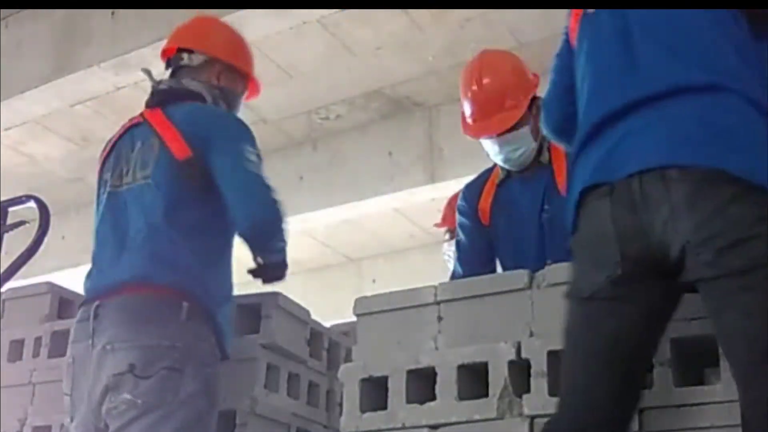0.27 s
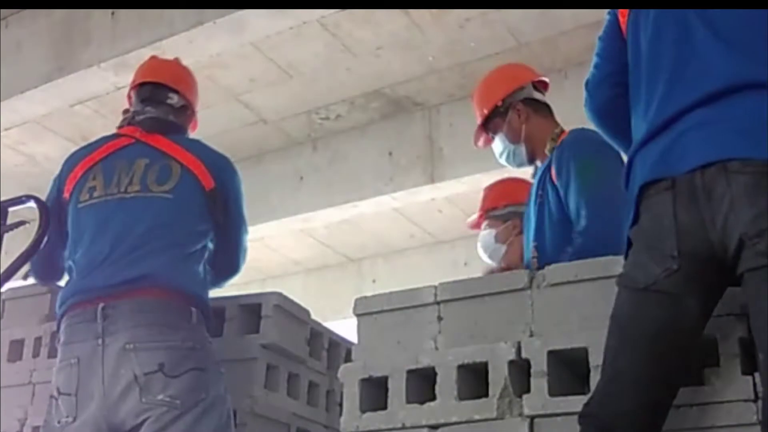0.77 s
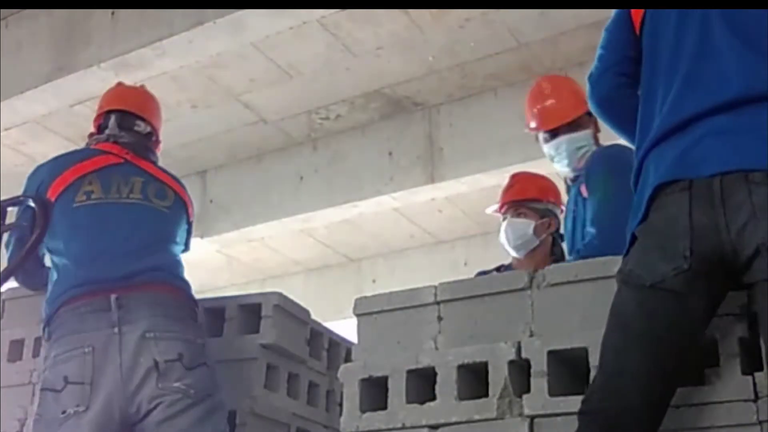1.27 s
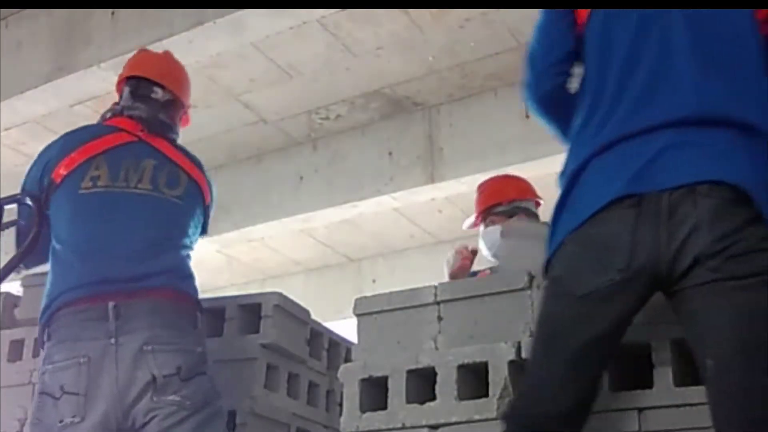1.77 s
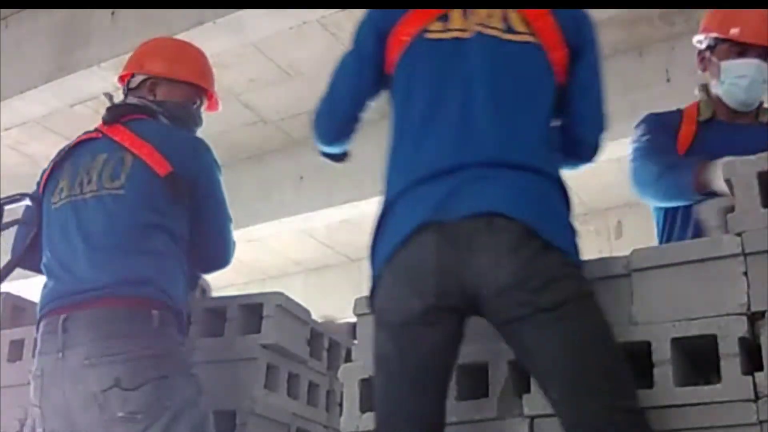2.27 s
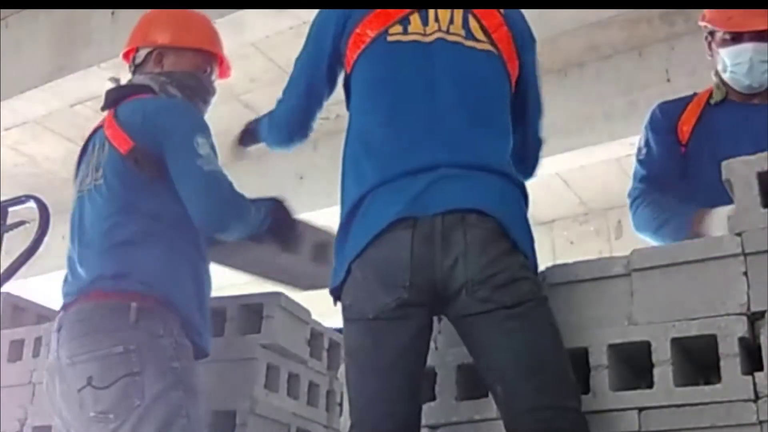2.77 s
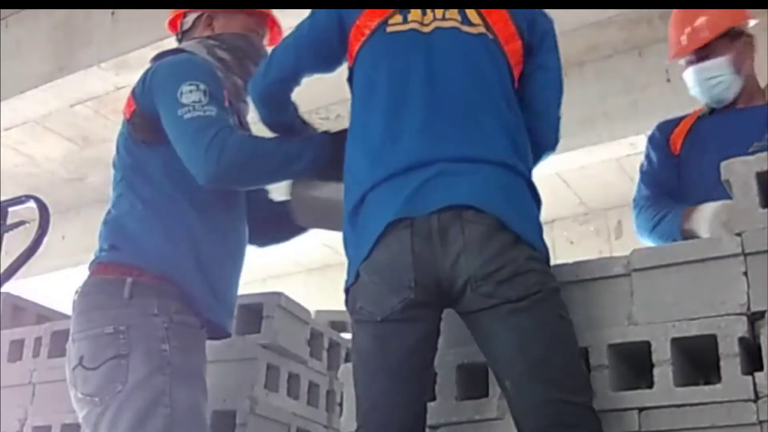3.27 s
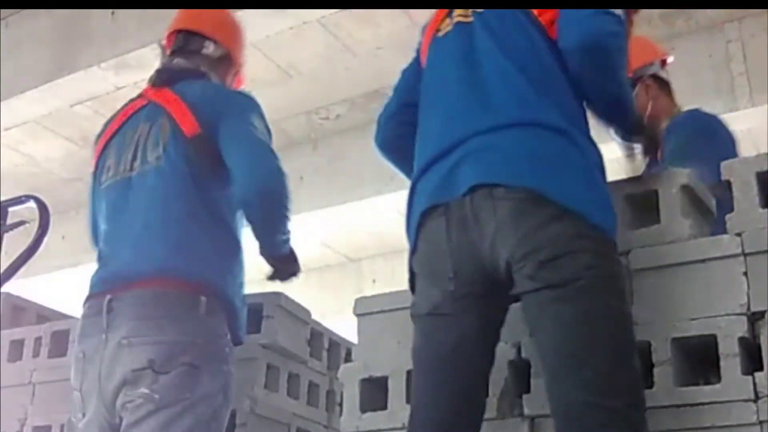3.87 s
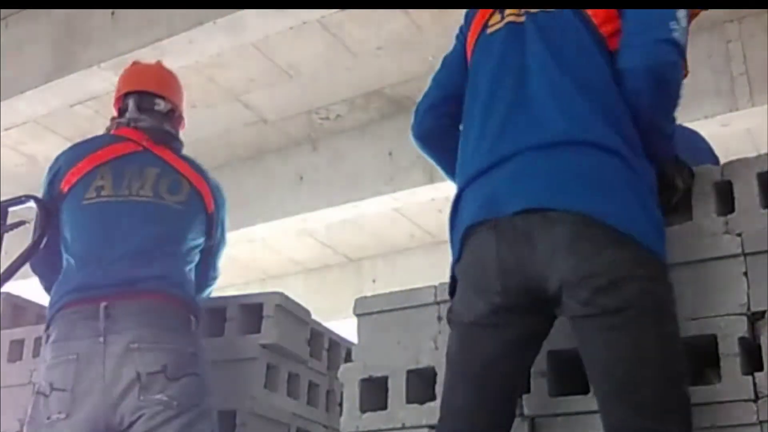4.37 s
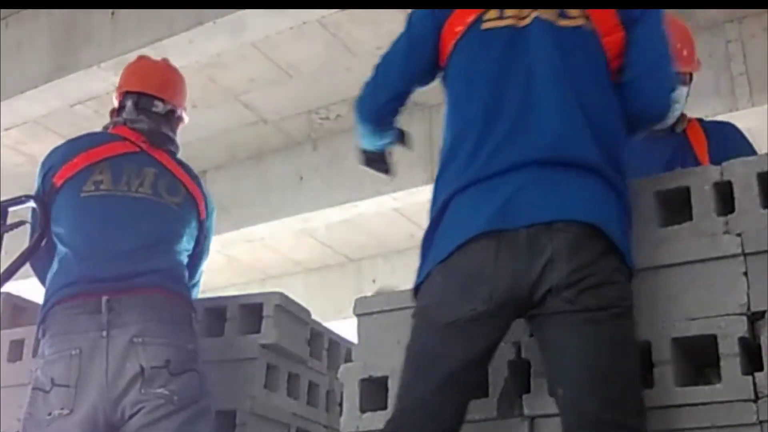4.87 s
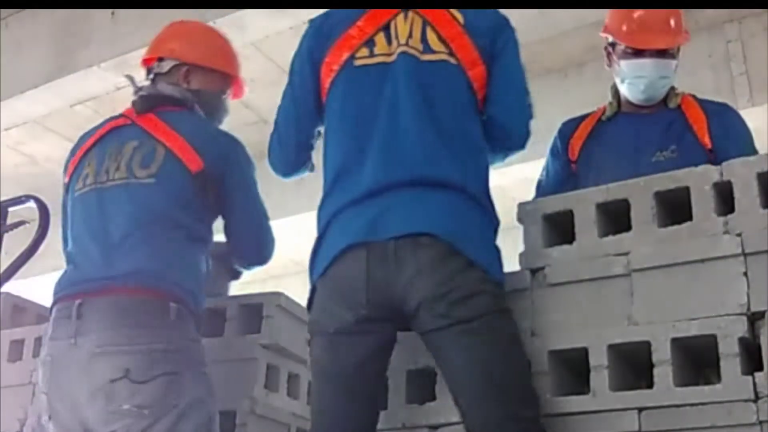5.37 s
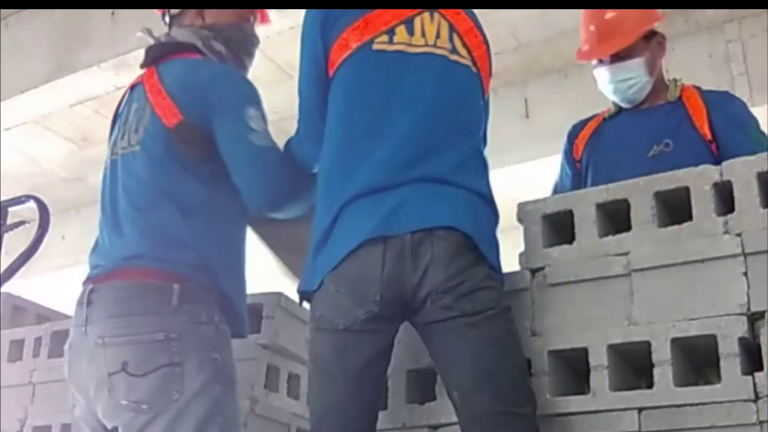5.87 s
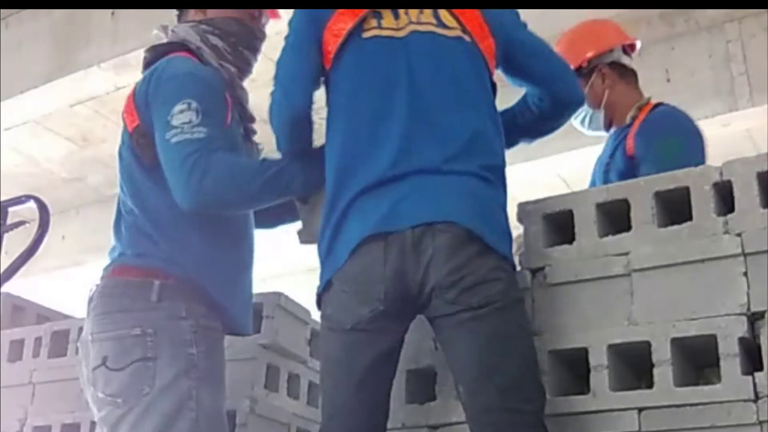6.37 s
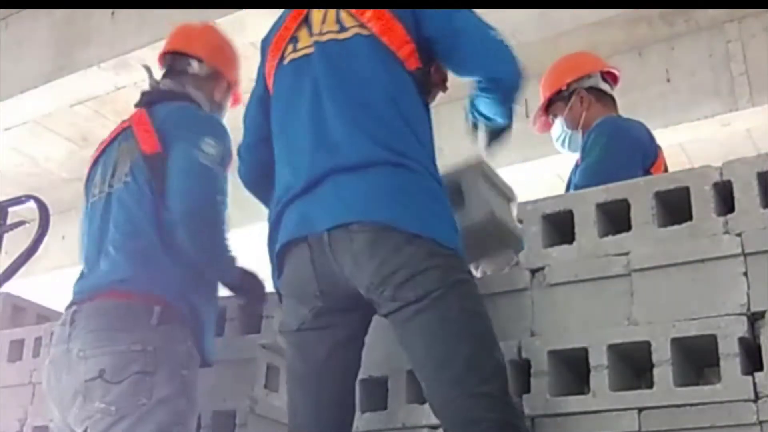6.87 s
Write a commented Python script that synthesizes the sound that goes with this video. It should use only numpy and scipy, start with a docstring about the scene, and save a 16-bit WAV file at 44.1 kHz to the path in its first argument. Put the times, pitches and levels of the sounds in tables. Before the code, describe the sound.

A quiet bed of low site rumble, mid-treble wash and high hiss runs throughout, slightly stronger at the start, in a concrete-ceilinged hall with a faint tail. Dull thuds and juddering clacks sound farther off at 0, 0.5 and 1.1 s. At about 0.25 s a block lands close, right of centre: hard hollow clack, short rattle, deck boom. A quieter gap with faint rustles follows. At 2.35 s a gritty landing, then lighter knocks at 2.4-3.3 s. At 3.75 s a hard crunching landing with rough mid-pitched scraping and low thumps. At 5.08 s a loud ringing strike clips the microphone; grit rushes and hisses down until about 5.8 s, with a faint ring and deck booms beneath. Small contacts, far knocks and scraping murmurs fill 6.2-6.8 s. At 6.94 s the last block slams down, bright and gritty, with a strong low boom.

```python
"""Stereo pair close to a scaffold deck under a concrete ceiling; hollow concrete blocks stack to its right.
From the start site noise, wash and hiss hold underneath, faint rustles pass, and dull knocks ring farther off.
Blocks then land corner, edge, face, among short contacts, thumps and rough mid-pitched noises: ringing modes and
gritty crushing overload the microphone, and each load makes the deck boom. Near five seconds loose grit hisses
down the pile as filtered grains and faint sines ring just after the fourth landing; a fifth landing follows."""
import sys
import numpy as np
from scipy import signal
from scipy.fft import rfft, irfft
from scipy.io import wavfile
from scipy.ndimage import uniform_filter1d

SR = 44100
rng = np.random.default_rng(int(sys.argv[2]) if len(sys.argv) > 2 else 0)


def log_audio(samples):
    """Write samples as a 16-bit WAV file to the path given in sys.argv[1]."""
    # one column per channel
    frames = np.atleast_2d(samples).T
    # limit to full scale, then quantise
    limited = np.clip(frames, -1, 1)
    pcm = np.round(limited * 32767).astype(np.int16)
    wavfile.write(sys.argv[1], SR, pcm)


N = 313992
TIME = np.arange(N) / SR

# centres of the four registers of a blow: body, clack, ring, grit [f/Hz]
REGISTER_HZ = [380, 800, 2200, 7000]
# ringing modes of a hollow block [f/Hz, level flat/dB, level on one end/dB, t60/s]
BLOCK_MODES = [(358.6, 6.5, 5.5, 0.046), (460, 3, -9, 0.035), (601.5, -3.5, 3.5, 0.064),
               (654.4, 1.5, -7.5, 0.069), (696.4, -4.5, -3.5, 0.063), (794, -10.5, -6, 0.044),
               (1012, -5.5, -12, 0.048), (1087, -11, 1, .045), (1400, -5, -2, 0.032),
               (1540, -3, -5.5, 0.059), (1723, -4, -9, .045), (1996, -2, -17, .028),
               (2264, -1.5, -11, 0.035), (2505, -35, -1, .055), (2670, -6, -30, 0.015),
               (2924, -4, -21, 0.016), (3290, -5.5, -24, 0.023)]
# spectrum of rough faces crushing [f/Hz, level per Hz/dB]
CRUNCH = [(60, 1), (200, 6.5), (380, 7.5), (600, 1), (900, 3), (1300, -8.5), (2500, 1), (3500, -13),
          (4300, -21.5), (6500, -32.5), (9500, -22.5), (15000, -90)]
# a block is too small to radiate deep bass [f/Hz, level/dB]
BLOCK_BASS_CUT = [(200, -10), (320, -0.5)]

# steady site noise: low part [f/Hz, level per Hz/dB], then its level over time [t/s, level/dB]
SITE_SPECTRUM = [(20, -28), (40, -32), (64, -2), (108, -1), (172, 0.5), (340, -4), (430, -13), (700, -10.5),
                 (1050, -20.5), (1500, -24), (2500, -28), (4000, -61)]
SITE_LEVEL = [(0, -31), (.8, -35), (1.9, -39), (4.2, -37.5), (4.9, -42.5), (5.7, -41), (7.1, -36)]
# mid-treble wash and high hiss [f/Hz, level per Hz/dB]
WASH_SPECTRUM = [(900, -18), (2000, -3), (2700, 3.5), (3200, 11), (3850, 9), (4400, 0.5), (6000, -54)]
HISS_SPECTRUM = [(2000, -5.5), (4400, -3.5), (5200, -1), (6100, -8), (7000, -6), (8700, -1.5), (10900, -1),
                 (12500, -9.5), (15200, -18)]
# rise and fall shared by wash and hiss [t/s, level/dB]
TREBLE_LEVEL = [(0, 4), (.7, 0), (3.298, -.5), (3.9, -5), (4.35, -2), (4.698, -2.5), (6.001, -3),
                (7.1, -6.5)]
HISS_DB, WASH_DB = -41.5, -47.5  # added to the treble level
WASH_DEPTH = 1.4  # the wash follows the treble level more steeply than the hiss

# short faint hisses and rustles at various pitches
# [t/s, length t/s, level/dB, f/Hz, width of each pole f/Hz]
RUSTLES = [(0, 0.4, -32.5, 1470, 2000), (0.056, 0.13, -37, 2740, 1650), (1.24, 0.33, -43.5, 12100, 2640),
           (2.142, 0.33, -45.5, 10380, 3050), (2.327, 0.0055, -16, 8700, 4000),
           (2.328, 0.071, -28, 8900, 2305), (2.421, 0.27, -40.5, 1380, 1400),
           (2.91, 0.26, -43, 11400, 3200), (3.722, 0.085, -26, 2820, 900), (4.137, 0.099, -30, 9800, 2600),
           (4.156, 0.17, -36, 8560, 2400), (4.116, 0.2, -35, 1750, 4330), (6.734, 0.32, -42, 11080, 3020),
           (6.74, 0.22, -40.5, 2160, 896)]

# knocks farther off, often half a second apart [t/s, thud level/dB, clack level/dB, boom level/dB]
FAR_KNOCKS = [(.03, -16.5, -16, -28), (.52, -17.5, -20, -30.5), (1.029, -25, -31.5, -35),
              (1.1, -23.5, -35, -36), (2.072, -29.5, -62, -42), (2.196, -24, -55, -45),
              (2.549, -20.5, -45, -31), (2.733, -22.5, -43, -51), (2.838, -22, -61, -50),
              (3.048, -23.5, -28, -48), (3.257, -18.5, -30, -38), (6.21, -23.5, -27, -28),
              (6.706, -22, -18, -23)]
# a far thud and a far clack by register: body, clack, ring [level/dB]
FAR_THUD = [2.6, -13, -27]
FAR_CLACK = [-30, 1.3, -27]
# the floor answers each far knock [delay t/s, level/dB]
FAR_BOOMS = [(.076, -1.5), (.118, -6.5)]
FAR_FIRMNESS_DB = 8.5  # per octave of deck mode
THUD_RISE_S, SLIP_RISE_S = .012, .0025  # time constants
JUDDER_DELAY_S, JUDDER_GAP_S = .034, .024
JUDDER_LOSS_DB, JUDDER_UNEVEN_DB = 2.5, 3  # loss per slip, random spread

# short pitched contacts, light or hard, alone or within landings [t/s, level/dB, strongest f/Hz]
CONTACTS = [(.078, -15.5, 950), (.281, 0.5, 1500), (.302, -14, 780), (.562, -16.5, 950), (.606, -27, 790),
            (.632, -21.5, 760), (1.074, -25, 770), (1.14, -27, 780), (2.329, -17, 380), (2.392, -10, 1200),
            (2.443, -17, 448), (2.453, -15, 520), (2.492, -19, 1100), (2.516, -30, 380), (2.796, -6.5, 560),
            (2.812, -19, 900), (2.841, -15.5, 430), (3.066, -22.5, 700), (3.086, -23, 1050),
            (3.228, -20.5, 855), (3.279, -15, 620), (3.298, -22, 1500), (3.748, 2, 650), (3.772, -11, 1500),
            (3.868, -23, 900), (4.123, -24, 850), (4.185, -17, 400), (4.203, -25, 380), (5.087, 3, 1400),
            (5.514, -14.5, 544), (5.534, -17.5, 697), (5.743, -25.5, 750), (6.254, -16.5, 780),
            (6.276, -13.5, 670), (6.3, -12, 730), (6.324, -13, 850), (6.356, -15, 726), (6.398, -20, 690),
            (6.732, -17.5, 820), (6.782, -14.5, 700), (7.08, -8.5, 710)]
CONTACT_DB_PER_OCTAVE = 18.5  # how fast a short contact weakens away from that pitch
CORNER_RING, CONTACT_RING = 0.86, 0.51  # share of the full ring time

# deck modes at rest [f/Hz], then their ring in the same order [level/dB, t60/s]
DECK_HZ = [62, 84, 113, 146, 163, 190, 228, 275]
DECK_RING = [(-10.5, 0.13), (0.5, 0.11), (-16, 0.04), (-1, 0.078), (-7, 0.1), (-7, 0.064), (-4, 0.057),
             (-16, 0.062)]
DECK_DETUNE = .06  # ratio, scaled by a random draw
# weak deep bass of the deck [f/Hz, level/dB]
DECK_BASS_CUT = [(10, -30), (38, -35), (62, 3.5)]
# the deck takes every landing in the same few jolts [delay t/s, level/dB]
SAG = [(.008, -6), (0.029, 1), (0.054, 1.5), (0.092, -1), (0.105, -2.5)]
# further deck booms, rebounds or treads [t/s, level/dB, firmness per octave/dB]
FURTHER_BOOMS = [(.42, -24, -9), (.555, -26, -10), (0.679, -20.5, -7), (0.869, -30.5, -3),
                 (2.462, -19.5, -5), (2.669, -24.5, 0), (3.272, -33, -6), (3.89, -16, -11),
                 (3.94, -23.5, 3), (4.035, -22.5, -16), (4.09, -20, -19), (4.148, -21.5, -4),
                 (4.56, -25.5, -8), (5.225, -18.5, 4), (5.295, -21.5, 5), (5.372, -12.5, -8),
                 (5.41, -10.5, -6.5), (5.537, -20, -6), (5.718, -29.5, 5.5), (5.787, -23.5, -5),
                 (5.865, -32.5, -4)]
# short low thumps, some together with a landing [t/s, level/dB, f/Hz]
LOW_THUMPS = [(0.114, -4, 136), (0.153, -12, 140), (.257, -7, 196), (.345, -12, 210), (2.449, -8.5, 112),
              (2.731, -12, 129), (3.763, -9, 280), (3.797, -6, 130), (4.195, -15, 216), (5.338, -10, 165),
              (5.48, -15.5, 200), (6.276, -14, 149), (6.297, -15, 130), (6.789, -12, 142),
              (6.826, -10.5, 127), (6.868, -10, 165)]
THUMP_T60_S = 0.054

# landings: corner touches, edge strikes and rings, face slaps and rattles, deck sags
# [strike t/s, wall pitch ratio, 0 flat to 1 on its end, corner lead t/s, corner level/dB,
#  corner brightness level/dB, body level/dB, ring level/dB, grit level/dB, right-left of ring level/dB,
#  time between bounces t/s, slap level/dB, slap grit level/dB, boom level/dB, firmness per octave/dB]
LANDINGS = [(0.2558, 1.075, 0.11, .0448, -9, -13, -4, 2.5, -5.5, 15, 0.013, -5.5, -32, -19.5, -10),
            (2.3576, 1.02, 0.23, 0.0036, -5.5, -20, -3, -1.5, 0, 16, 0.019, -14, -6.5, -32, 0),
            (3.7595, .998, 0.15, 0.0245, -5, -8.5, -4, -6.5, -2.5, 11, .0118, -7.5, -4.5, -20, -9),
            (5.0761, 1.002, 1, 0.016, -2.5, -32, -8, 3, -20, 20, .0105, -4, -28, -8, 1),
            (6.9386, 0.99, 1, 0.0018, -29, -10, -12.5, 6.5, -17, 49, 0.013, -2, 4.5, -3, 1)]
# corner touch by register: body, clack, ring, grit [level/dB]
CORNER = [-1, -19, 4.5, -16]
# face slap by register: body, clack, ring [level/dB]
SLAP = [-7.5, 0, -2.6]
STRIKE_CLACK_DB = -8  # relative to the body
BOUNCE_LOSS_DB, BOUNCE_UNEVEN = 4.5, .22  # loss per bounce; random share of the gap
BOUNCE_SIDE_DB = 0.5  # right-left of all but edge strikes
SPOT_DB = 3  # scales the random favour that each spot gives to a mode

# rough mid-pitched noises, some gliding, some only a murmur
# [t/s, length t/s, level/dB, first f/Hz, last f/Hz, width of each pole f/Hz]
ROUGH_NOISES = [(0.359, 0.15, -34, 784, 850, 422), (0.538, 0.18, -40, 850, 720, 480),
                (1.059, 0.23, -39.5, 735, 770, 450), (2.795, 0.061, -38, 1300, 1200, 1000),
                (3.059, .09, -38, 950, 1090, 600), (3.271, 0.078, -39.5, 1700, 2100, 1800),
                (3.294, 0.11, -39.5, 850, 760, 400), (3.806, .12, -25.5, 600, 810, 240),
                (3.795, .06, -27, 1130, 1130, 260), (3.832, 0.28, -39, 1930, 2020, 500),
                (3.883, .17, -29, 1070, 1170, 240), (4.179, 0.056, -33.5, 1590, 1700, 600),
                (5.735, 0.3, -37, 810, 750, 440), (6.216, 0.2, -34, 308, 453, 150),
                (6.28, 0.18, -29, 816, 750, 380), (6.703, 0.13, -31, 315, 396, 160),
                (6.417, 0.33, -40, 756, 760, 453), (6.771, 0.34, -31.5, 764, 756, 435)]
BURST_GAP_S, BURST_DECAY_S = .015, .006
STEADY_SHARE = .5  # gain of the noise between bursts

# coarse rush of grit [f/Hz, level per Hz/dB]
RUSH_SPECTRUM = [(200, -49), (600, -9), (1400, 3), (2800, 5), (3700, -0.5), (4500, -8.5), (6200, -20),
                 (8500, -7), (11000, -21)]
RUSH_START_S, RUSH_RISE_S, RUSH_HOLD_S = 5.055, 0.014, 0.57
RUSH_DB, RUSH_SAG_DB_PER_S = -25.5, 8
RUSH_FALL_DB_PER_S = 28  # on top of the sag, after the hold
# bands of fine hiss [t/s, hold t/s, level/dB, full from f/Hz, full up to f/Hz]
FINE_HISSES = [(5.057, 0.27, -24, 9600, 11500), (5.07, 0.29, -32, 5200, 7840),
               (5.428, 0.18, -29, 5330, 9700)]
FINE_RISE_S, FINE_FALL_DB_PER_S = 0.04, 105

# a faint steady ring just after the fourth landing [f/Hz, level/dB, t60/s]
FAINT_RING = [(1094, -25, .8), (1421, -29, .65), (1453, -21, .45), (2511, -34, .5)]

# reflections off the piles close by, and the long tail of the hall [f/Hz, t60/s]
NEAR_T60 = [(100, 0.2), (350, 0.083), (800, 0.17), (2000, 0.074), (5000, 0.19), (12000, 0.11)]
HALL_T60 = [(100, 1.4), (400, 0.24), (900, 1.73), (1600, 0.76), (2500, 0.31), (10000, 0.51)]
# how alike diffuse sound is at the two ports [f/Hz, left-right likeness]
PORT_LIKENESS = [(60, 0.98), (150, 0.97), (350, 0.5), (800, 0.56), (1500, 0), (6000, 0.04)]
# colour difference between the ports [f/Hz, left-right level/dB]
PORT_TILT = [(60, -1.8), (200, -2), (400, -4), (800, 0), (2300, -1.5), (4300, -2), (8000, -6), (11000, 7.5),
             (14800, 1)]
PORT_LAG = 7  # samples by which the left port hears later
EDGE_HZ = 15150  # upper band limit


def amp(db):
    """Decibels to gain."""
    return 10 ** (np.asarray(db) / 20)


def evened(x):
    """Scales to rms 1."""
    return x / np.sqrt(np.mean(x ** 2) + 1e-20)


def read(points, hz):
    """Reads a table on a log-frequency axis."""
    f, value = np.transpose(points)
    return np.interp(np.log(hz + 1), np.log(f + 1), value)


def add(mix, s, sound):
    """Adds a sound to the mix at time s."""
    part = mix[..., round(s * SR):][..., :sound.shape[-1]]
    part += sound[..., :part.shape[-1]]


def colour(x, points):
    """Filters by a spectrum of (f/Hz, level/dB)."""
    size = x.shape[-1]
    gain = amp(read(points, np.fft.rfftfreq(size, 1 / SR)))
    return irfft(rfft(x) * gain, size)


def diffuse(size):
    """White noise at the two ports: alike in the bass, nearly unrelated in the treble."""
    a, b = rfft(rng.standard_normal((2, size)))
    same = np.clip(read(PORT_LIKENESS, np.fft.rfftfreq(size, 1 / SR)), -1, 1)
    return irfft(np.array([a, same * a + np.sqrt(1 - same ** 2) * b]), size)


def patchy(x, depth_db, bins_count, frames_count):
    """Lets the level drift at random in patches of frequency and time."""
    z = signal.stft(x, nperseg=1024, noverlap=768)[2]
    patches = rng.standard_normal(z.shape[1:])
    patches = uniform_filter1d(patches, bins_count, 0)
    patches = evened(uniform_filter1d(patches, frames_count, 1))
    return signal.istft(z * amp(depth_db * patches), nperseg=1024, noverlap=768)[1][:, :N]


def background(spectrum, level_db, patchy_db):
    """Steady noise with drifting patches."""
    noise = patchy(diffuse(N), patchy_db, bins_count=6, frames_count=12)
    return evened(colour(noise, spectrum)) * amp(level_db)


def site():
    """Low site noise, a mid-treble wash and a high hiss, each as coloured noise."""
    low_db = np.interp(TIME, *np.transpose(SITE_LEVEL))
    treble_db = np.interp(TIME, *np.transpose(TREBLE_LEVEL))
    low = background(SITE_SPECTRUM, low_db, patchy_db=2)
    wash = background(WASH_SPECTRUM, WASH_DB + WASH_DEPTH * treble_db, patchy_db=-1.8)
    hiss = background(HISS_SPECTRUM, HISS_DB + treble_db, patchy_db=2.5)
    return low + wash + hiss


def grains(per_s):
    """A shower of tiny impacts of uneven size at each port."""
    size = amp(2 * np.minimum(rng.exponential(1, (2, N)), 4)) * rng.standard_normal((2, N))
    return size * (rng.random((2, N)) < per_s / SR)


def clumps(depth_db, clump_s):
    """A gain that swells and sags at random."""
    width = max(round(clump_s * SR), 1)
    drift = uniform_filter1d(uniform_filter1d(rng.standard_normal(N), width), width)
    return amp(depth_db * evened(drift))


def resonate(x, hz, width_hz):
    """A resonance of two equal poles that follows the curve hz."""
    turn = np.exp(2j * np.pi * np.cumsum(hz * np.ones(x.shape[-1])) / SR)
    r = np.exp(-np.pi * width_hz / SR)
    # shift the pitch down to zero, smooth, and shift back up
    smooth = signal.lfilter([(1 - r) ** 2], [1, -2 * r, r * r], x / turn)
    return 2 * (turn * smooth).real


def rustles():
    """A burst of fine grains around one pitch, from a tick to a long rustle."""
    out = np.zeros((2, N))
    sand = grains(per_s=20000) * clumps(depth_db=1.8, clump_s=.006)
    for s, length, db, hz, width_hz in RUSTLES:
        piece = sand[:, round(s * SR):][:, :round(length * SR)]
        rustle = evened(resonate(piece, hz, width_hz))
        swell = np.interp(np.linspace(0, 1, rustle.shape[1]), [0, .25, 1], [0, 1, 0])
        add(out, s, amp(db) * rustle * swell)
    return out


def room(x, t60, build_s, size):
    """Dense reflections that build up, then die at each band's own speed."""
    hz, t, z = signal.stft(diffuse(size), SR, nperseg=256)
    decay = amp(-60 * t / read(t60, hz)[:, None])
    tail = signal.istft(z * decay, SR, nperseg=256)[1]
    tail *= 1 - np.exp(-(TIME[:tail.shape[1]] / build_s) ** 2)
    return signal.fftconvolve(x, tail / np.linalg.norm(tail[0]), axes=1)[:, :x.shape[1]]


def placed(sound, close_db):
    """A sound on the right reaches the left port later; each call draws its own reflections off the piles."""
    direct = np.array([np.pad(sound, (PORT_LAG, 0))[:len(sound)], sound])
    return direct + amp(close_db) * room(sound[None], NEAR_T60, build_s=0.003, size=8192)


def contact(parts_db, pitch, on_end, held, detune, ring_db, crunch_db, crunch_t60, rise_s):
    """The block's modes ring for a scaled time while rough faces crush; the blow weights each register."""
    t = TIME[:8192]
    force = list(zip(REGISTER_HZ, parts_db))
    share = np.clip(on_end, 0, 1)
    stretch = pitch * (1 + detune * rng.uniform(-0.86, 1, len(BLOCK_MODES)))
    spot_db = SPOT_DB * rng.uniform(-1.34, 1, len(BLOCK_MODES))  # each spot favours other modes
    ring = np.zeros(len(t))
    for k, (hz, flat_db, end_db, t60) in enumerate(BLOCK_MODES):
        mode_db = (1 - share) * flat_db + share * end_db + spot_db[k] + read(force, hz)
        decaying = amp(mode_db - 60 * t / (t60 * held))
        ring += (-1) ** k * decaying * np.sin(2 * np.pi * hz * stretch[k] * t)
    rough = evened(colour(rng.standard_normal(len(t)), CRUNCH))
    crunch = colour(rough, force) * amp(-60 * t / crunch_t60)
    return (amp(ring_db) * ring + amp(crunch_db) * crunch) * (1 - np.exp(-t / rise_s))


def far_contact(parts_db, held, scuff_s, rise_s):
    """A soft-edged contact with a scuff and hardly any grit."""
    knock = contact([*parts_db, -62], pitch=0.92, on_end=0.66, held=held, detune=0.088,
                    ring_db=-3.5, crunch_db=1.5, crunch_t60=scuff_s, rise_s=rise_s)
    return placed(knock, close_db=-0.5)


def judder(count):
    """A block shoved into place slips in uneven jerks that weaken: rows of (delay t/s, level/dB)."""
    draws = rng.uniform([-.15, -1], [.15, 1], (count, 2))
    return [(JUDDER_DELAY_S + (k + shift) * JUDDER_GAP_S, JUDDER_UNEVEN_DB * size - k * JUDDER_LOSS_DB)
            for k, (shift, size) in enumerate(draws)]


def far_blocks():
    """Elsewhere on the floor: a dull thud, then the block judders into place."""
    out = np.zeros((2, N))
    for s, thud_db, clack_db, _ in FAR_KNOCKS:
        thud = far_contact(np.add(FAR_THUD, thud_db), held=1.52, scuff_s=0.084, rise_s=THUD_RISE_S)
        add(out, s, thud)
        for delay_s, db in judder(count=6):
            parts_db = np.add(FAR_CLACK, clack_db + db)
            add(out, s + delay_s, far_contact(parts_db, held=0.81, scuff_s=0.043, rise_s=SLIP_RISE_S))
    return out


def hall(near, far, boom):
    """The long tail under the ceiling: far knocks are sent to it at a higher gain than pile or deck."""
    sent = amp(-20) * near + amp(-6) * far + amp(-18) * boom
    return room(sent, HALL_T60, build_s=0.032, size=SR)


def on_pile(parts_db, side_db, pitch=1, on_end=0, held=1):
    """A contact on the pile to the right, so the left port hears its ring more weakly."""
    rise_s = np.interp(parts_db[-1], [-38, -20], [.0012, .0006])  # a gritty, hard contact starts faster
    knock = contact(parts_db, pitch, on_end, held, detune=.005, ring_db=-1,
                    crunch_db=5.5, crunch_t60=.035, rise_s=rise_s)
    left, right = placed(knock, close_db=-4.5)
    shade = [(300, 0), (1100, 0), (2200, -side_db), (4000, -side_db), (9000, 0)]
    return np.array([colour(left, shade), right])


def short_contacts():
    """Short pitched contacts, light or hard, alone or within landings: the ring is cut short."""
    out = np.zeros((2, N))
    for s, db, hz in CONTACTS:
        octaves_off = abs(np.log2(np.divide(REGISTER_HZ, hz)))
        parts_db = db - CONTACT_DB_PER_OCTAVE * octaves_off
        pitch, on_end = rng.uniform(0.96, 1.063), rng.random()
        add(out, s, on_pile(parts_db, BOUNCE_SIDE_DB, pitch, on_end, CONTACT_RING))
    return out


def jolts():
    """All that shakes the deck: rows of (t/s, level/dB, firmness per octave/dB)."""
    loads = [(s + delay_s, boom_db + db, firmness)
             for s, *_, boom_db, firmness in LANDINGS for delay_s, db in SAG]
    knocks = [(s + delay_s, boom_db + db, FAR_FIRMNESS_DB)
              for s, *_, boom_db in FAR_KNOCKS for delay_s, db in FAR_BOOMS]
    return loads + knocks + list(FURTHER_BOOMS)


def deck():
    """Each load sets planks booming; firmness wakes upper modes, and random spots shift pitch and strength."""
    t, out = TIME[:16384], np.zeros((2, N))
    mode_db, t60 = np.transpose(DECK_RING)
    octaves = np.log2(np.array(DECK_HZ) / DECK_HZ[1])
    for s, db, firmness_db in jolts():
        shift, spot = rng.uniform(-1.4, 1, (2, len(DECK_RING)))
        hz = DECK_HZ * (1 + DECK_DETUNE * shift)
        modes = amp(-60 * t / t60[:, None]) * np.sin(2 * np.pi * np.outer(hz, t))
        strength = amp(db - 1.0 + mode_db + firmness_db * octaves + SPOT_DB * spot)
        boom = strength @ modes * (1 - np.exp(-t / 0.0035))
        add(out, s, placed(boom, close_db=-8.0))
    return colour(out, DECK_BASS_CUT)


def low_thumps():
    """Short low thumps, some together with a landing: a decaying sine with a soft start."""
    t, out = TIME[:8192], np.zeros((2, N))
    for s, db, hz in LOW_THUMPS:
        push = amp(db - 60 * t / THUMP_T60_S) * np.sin(2 * np.pi * hz * t)
        add(out, s, placed(push * (1 - np.exp(-t / 0.0046)), close_db=-8.0))
    return out


def rattle(bounce_s, slap_db, grit_db, count):
    """The face slaps, then bounces unevenly and weaker: rows of (delay t/s, level by register/dB)."""
    gaps = bounce_s * np.append(1, 1 + BOUNCE_UNEVEN * rng.uniform(-1, 1, count - 1))
    first_db = np.append(np.add(SLAP, slap_db), grit_db)
    return [(delay_s, first_db - k * BOUNCE_LOSS_DB) for k, delay_s in enumerate(np.cumsum(gaps))]


def landings():
    """Each block lands in stages: a held corner touches, an edge strikes freely, the face rattles to rest."""
    out = np.zeros((2, N))
    for (s, pitch, on_end, lead_s, corner_db, bright_db, body_db, ring_db, grit_db, side_db,
         bounce_s, slap_db, slap_grit_db, _, _) in LANDINGS:
        touch_db = np.add(CORNER, corner_db) + [0, 0, bright_db, bright_db]
        add(out, s - lead_s, on_pile(touch_db, BOUNCE_SIDE_DB, pitch, on_end, CORNER_RING))
        strike_db = [body_db, body_db + STRIKE_CLACK_DB, ring_db, grit_db]
        add(out, s, on_pile(strike_db, side_db, pitch, on_end))
        for delay_s, parts_db in rattle(bounce_s, slap_db, slap_grit_db, count=3):
            add(out, s + delay_s, on_pile(parts_db, BOUNCE_SIDE_DB, pitch, on_end))
    return out


def rough_noises():
    """Rough mid-pitched noises, some gliding, some only a murmur: uneven bursts of noise in a resonance."""
    out = np.zeros((2, N))
    for s, length, db, first_hz, last_hz, width_hz in ROUGH_NOISES:
        t = TIME[:round(length * SR)]
        gaps, sizes = rng.uniform([.4, .4], [1.6, 1], (32, 2)).T
        since = t - (np.cumsum(gaps) - gaps[0])[:, None] * BURST_GAP_S
        bursts = sizes @ ((since >= 0) * np.exp(-abs(since) / BURST_DECAY_S))
        rough = diffuse(size=16384)[:, :len(t)] * (STEADY_SHARE + bursts)
        pitched = resonate(rough, np.linspace(first_hz, last_hz, len(t)), width_hz)
        swell = np.interp(t / length, [0, .2, .55, 1], [0.12, 0.98, 0.48, 0.11])
        add(out, s, amp(db) * evened(pitched) * swell)
    return out


def flow(start_s, rise_s, hold_s, fall_db_per_s):
    """A run of grit starts quickly, holds, then dies away."""
    t = np.maximum(TIME - start_s, 0)
    return np.minimum(t / rise_s, 1) * amp(-fall_db_per_s * np.maximum(t - hold_s, 0))


def sliding_grit():
    """Loose grit runs down the pile: a coarse rush that thins, and bands of fine hiss with uneven level."""
    coarse = patchy(grains(per_s=4000), 2.5, bins_count=7, frames_count=10)
    clumped = grains(per_s=4500) * clumps(depth_db=1.2, clump_s=.008)
    sand = patchy(clumped, 3.2, bins_count=8, frames_count=20)
    rush_db = RUSH_DB - RUSH_SAG_DB_PER_S * np.maximum(TIME - RUSH_START_S, 0)
    rush_flow = flow(RUSH_START_S, RUSH_RISE_S, RUSH_HOLD_S, RUSH_FALL_DB_PER_S)
    out = evened(colour(coarse, RUSH_SPECTRUM)) * amp(rush_db) * rush_flow
    for s, hold_s, db, low_hz, high_hz in FINE_HISSES:
        band = [(low_hz / 2, -40), (low_hz * 0.88, -13), (low_hz, 0),
                (high_hz, 0), (high_hz * 1.04, -7), (high_hz * 1.3, -14), (high_hz * 2.0, -20)]
        fine_flow = flow(s, FINE_RISE_S, hold_s, FINE_FALL_DB_PER_S)
        out = out + evened(colour(sand, band)) * amp(db) * fine_flow
    return out


def faint_ring():
    """A faint steady ring just after the fourth landing: a few slowly decaying sines."""
    t, out = TIME[:SR], np.zeros((1, N))
    ring = sum(amp(db - 60 * t / t60) * np.sin(2 * np.pi * hz * t) for hz, db, t60 in FAINT_RING)
    add(out, 5.085, ring)
    return out


def scene():
    """All sources, with the long tail of the hall."""
    near = colour(short_contacts() + landings(), BLOCK_BASS_CUT)
    far = far_blocks()
    boom = deck() + low_thumps()
    blocks = near + far + boom + hall(near, far, boom)
    return site() + rustles() + blocks + rough_noises() + sliding_grit() + faint_ring()


def record(dry):
    """The two ports differ in colour; the loudest peaks flatten at full scale; then the band limit."""
    ports = np.array([colour(x, [(hz, sign * db / 2) for hz, db in PORT_TILT])
                      for x, sign in zip(dry, (1, -1))])
    clipped = ports / (1 + ports ** 6) ** (1 / 6)
    lowpass = signal.firwin(511, EDGE_HZ, window=("kaiser", 9), fs=SR)
    return signal.oaconvolve(clipped, lowpass[None], "same")


dry = scene()
out = record(dry)
log_audio(out)
```